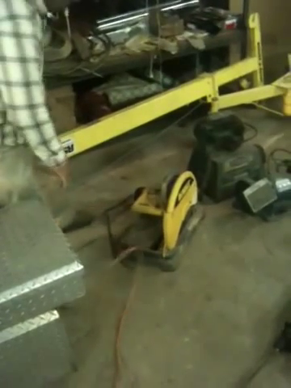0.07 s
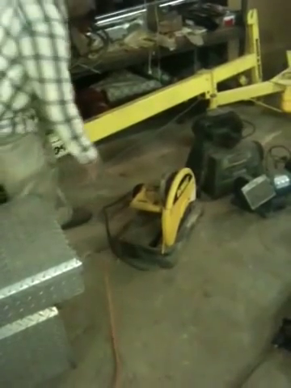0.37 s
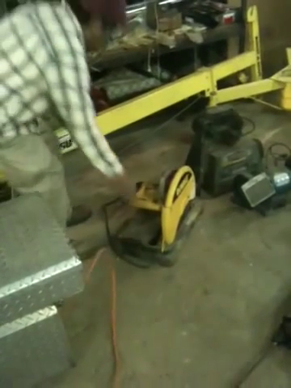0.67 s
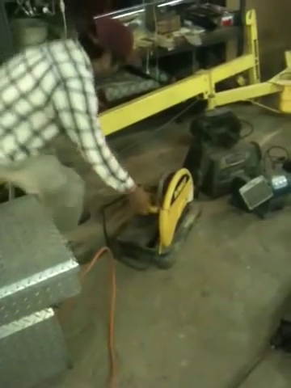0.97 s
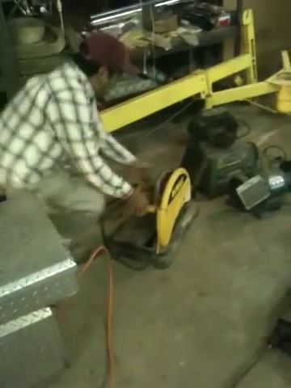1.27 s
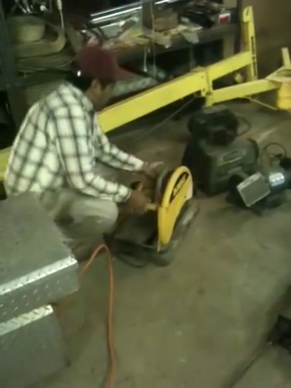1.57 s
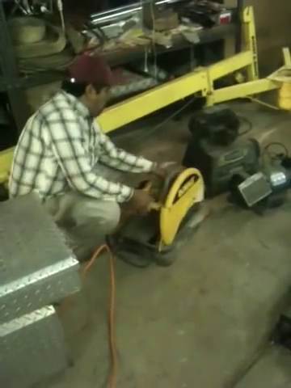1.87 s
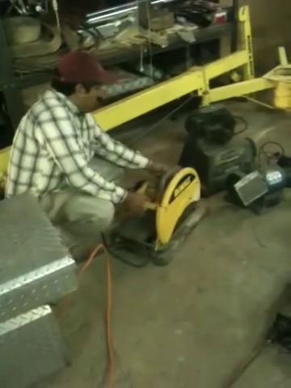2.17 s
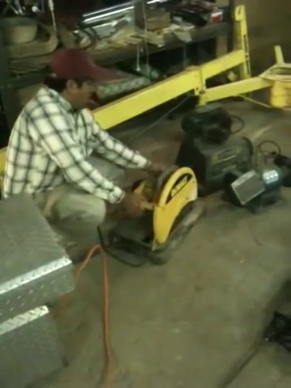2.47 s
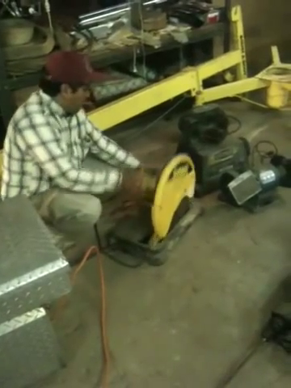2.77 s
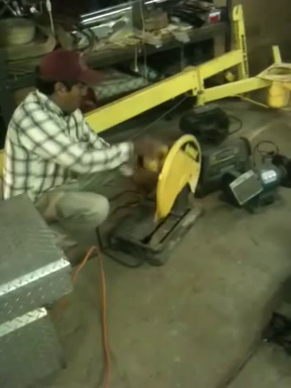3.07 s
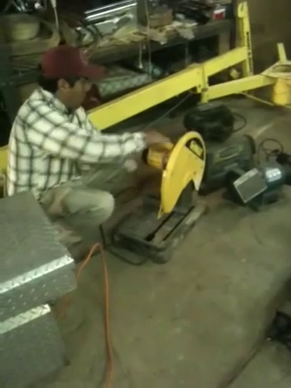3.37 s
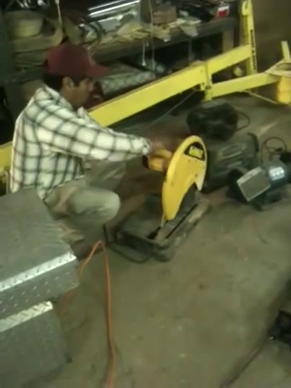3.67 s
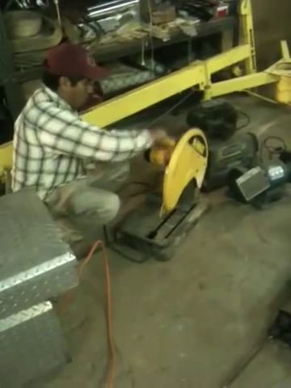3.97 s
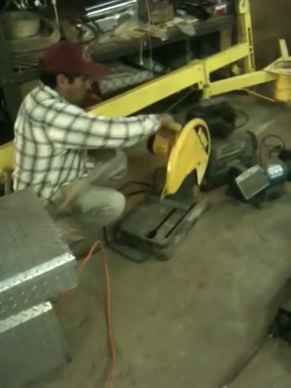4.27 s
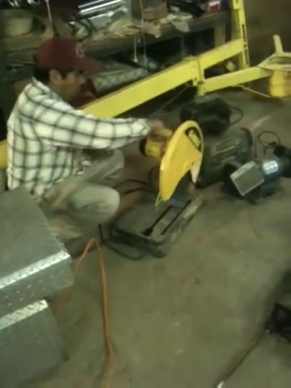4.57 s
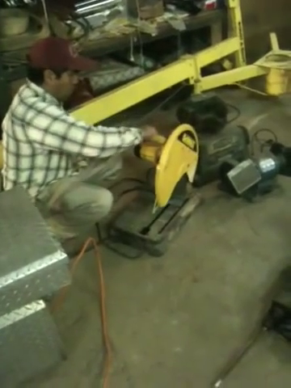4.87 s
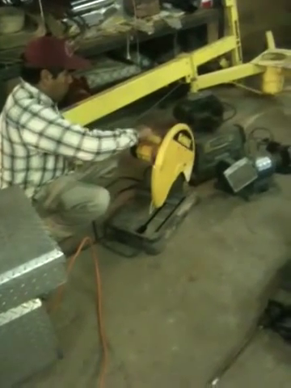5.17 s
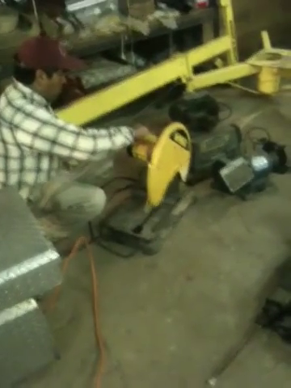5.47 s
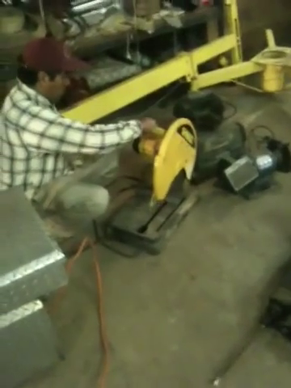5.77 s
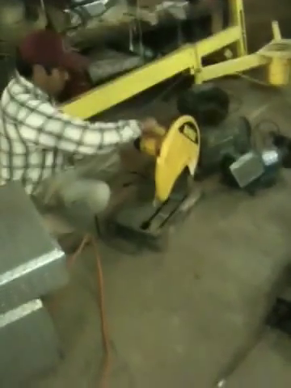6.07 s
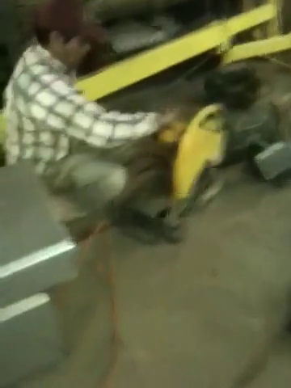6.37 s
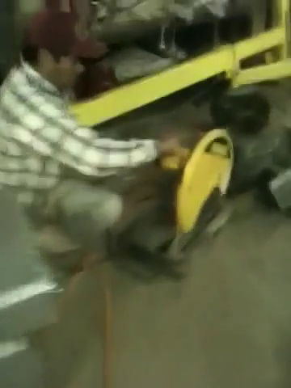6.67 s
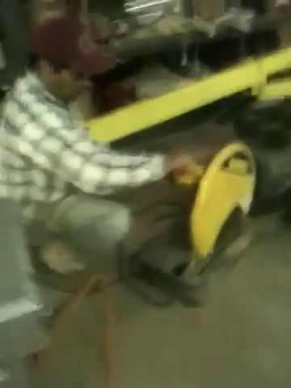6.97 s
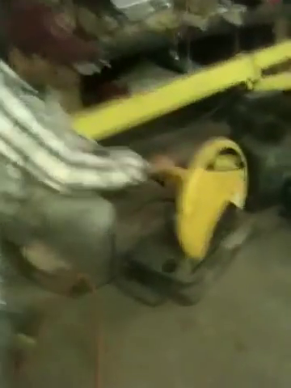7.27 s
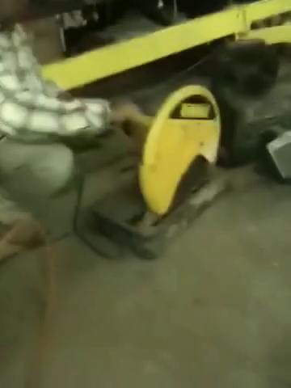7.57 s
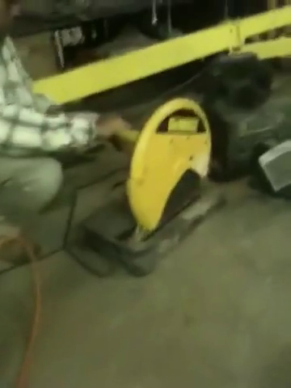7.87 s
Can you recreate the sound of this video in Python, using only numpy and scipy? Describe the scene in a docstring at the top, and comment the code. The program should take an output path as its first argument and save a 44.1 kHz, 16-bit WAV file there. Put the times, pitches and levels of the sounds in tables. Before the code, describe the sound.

A chop saw's head clunks loudly twice, then its motor is blipped and held, running up to a steady whine with rushing air.

```python
"""An abrasive chop saw in a workshop, close to the microphone. Its trigger is blipped, then held: the brush
motor buzzes with inrush current, coasts, and runs up with commutator whine, gear noise and rushing air.
Before that, over the quiet of the room, someone steps up, presses the creaking head down and pulls the
lock pin; the sprung head clunks against its stop. The loudest moments overload the microphone."""
import sys
import numpy as np
from scipy import signal
from scipy.fft import rfft, irfft
from scipy.io import wavfile
from scipy.ndimage import uniform_filter1d

SR = 44100
rng = np.random.default_rng(int(sys.argv[2]) if len(sys.argv) > 2 else 0)


def unload_audio(sound):
    """Save the sound as a 16-bit wav file, at the path given as the first command line argument."""
    columns = np.transpose(np.atleast_2d(sound))
    # keep every value between -1 and 1, then stretch to whole-number steps
    steps = np.round(np.clip(columns, -1, 1) * 32767)
    wavfile.write(sys.argv[1], SR, steps.astype(np.int16))


N = 358533
T = np.arange(N) / SR


def undb(db):
    """Decibels to amplitude."""
    return 10 ** (np.asarray(db) / 20)


def unit(x):
    """Scale to rms 1."""
    return x / np.sqrt(np.mean(x ** 2))


def curve(rows, column=1):
    """One column of a table, joined by straight lines over time."""
    rows = np.array(rows, float)
    return np.interp(T, rows[:, 0], rows[:, column])


def noise():
    """White noise."""
    return rng.standard_normal(N)


def wander(rate_hz):
    """Smooth random drift with rms 1."""
    hold = int(SR / rate_hz)
    stairs = np.repeat(rng.standard_normal(N // hold + 1), hold)
    return unit(uniform_filter1d(uniform_filter1d(stairs, hold), hold)[:N])


def colour(x, spectrum):
    """Minimum-phase filter with the given (Hz, dB) shape and unit power gain."""
    size = 4096
    hz, db = np.transpose(spectrum)
    bins_hz = np.arange(size // 2 + 1) * SR / size
    gain = undb(np.interp(np.log(bins_hz + 1), np.log(hz), db))
    cepstrum = irfft(np.log(gain))
    cepstrum[1:size // 2] *= 2
    cepstrum[size // 2 + 1:] = 0
    response = irfft(np.exp(rfft(cepstrum)))
    return signal.fftconvolve(x, response / np.linalg.norm(response))[:len(x)]


def resonate(x, hz, width):
    """Two-pole resonance, gain 1 at the centre."""
    return signal.lfilter(*signal.iirpeak(hz, hz / width, fs=SR), x)


def soften(x, hz):
    """Roll off the treble above hz."""
    return signal.sosfilt(signal.butter(2, hz, fs=SR, output="sos"), x)


def burst(decay_s):
    """The brief chatter of two surfaces meeting."""
    t = T[:SR // 4]
    return rng.standard_normal(len(t)) * np.exp(-t / decay_s)


def add(track, s, sound):
    """Mix a sound into a track at time s."""
    start = int(s * SR)
    track[start:start + len(sound)] += sound[:N - start]


def room(x, wet_db, low_t60=0.59, treble_t60=0.49):
    """What reaches the microphone: direct sound and the workshop's diffuse tail."""
    t = T[:SR]
    low = soften(rng.standard_normal(SR), 2730)
    white = rng.standard_normal(SR)
    treble = soften(white - soften(white, 1320), 12000)
    tail = low * 1000 ** (-t / low_t60) + 0.47 * treble * 1000 ** (-t / treble_t60)
    tail *= np.clip((t - .002) / 0.0026, 0, 1)  # reflections begin after 2 ms
    reverb = signal.fftconvolve(x, tail / np.linalg.norm(tail))[:N]
    wet = undb(wet_db)
    return (x + wet * reverb) / np.hypot(1, wet)


# room tone all around the microphone: (frequency [Hz], level [dB])
WORKSHOP_SPECTRUM = [(29, -67), (50, -47), (109, -8), (209, -3.5), (236, -2), (267, -7), (552, -12.5),
                     (1390, -15.5), (2310, -22), (3580, -22), (3940, -22.5), (16500, -21.5)]

def room_tone():
    """The quiet workshop: a faint, low noise that wavers slowly."""
    return colour(noise(), WORKSHOP_SPECTRUM) * undb(-62.5 + .9 * wander(3.9))


# soles on the concrete floor by the saw: (time [s], level [dB], brightness [Hz])
STEPS = [(0.133, -48, 800), (0.285, -30, 11000), (0.304, -30.5, 7500), (0.345, -36, 1500),
         (0.38, -35, 1200), (0.42, -38.5, 1200), (0.531, -48, 1200), (0.656, -38, 1000),
         (0.792, -41.5, 260)]
# the thud of a shoe: (frequency [Hz], level [dB])
SHOE_SPECTRUM = [(41, -55), (70, -27), (198, 0), (316, -6.5), (461, 0.5), (515, -5), (687, -16), (838, -15),
                 (916, -16.5), (7360, -29), (14000, -23)]

def footsteps():
    """Heel and sole land, then the weight shifts."""
    contact = np.zeros(N)
    for s, db, bright_hz in STEPS:
        add(contact, s, undb(db) * soften(burst(decay_s=0.0086), bright_hz))
    return colour(contact, SHOE_SPECTRUM)


# a sliding shoe, sleeves and the hinge: (peak time [s], level [dB], rise [s], fall [s])
RUBS = [(0, -33, .01, 0.027), (.165, -53, 0.076, .015), (.3, -51, .006, .035), (.6, -65, .02, .03),
        (.8, -60.5, 0.073, 0.092), (1.46, -60.5, 0.23, 0.18), (1.895, -51.5, 0.12, .035),
        (2.33, -60, .02, 0.018), (2.84, -45, 0.064, .06), (2.905, -42.5, 0.019, 0.042),
        (3.42, -60, 0.12, .025), (3.64, -64, .03, 0.037)]
# their scuffing: (frequency [Hz], level [dB])
SCUFF_SPECTRUM = [(120, -50), (250, -8.5), (400, -1), (600, -12.5), (1300, -11), (2700, -12), (6000, -10),
                  (11000, -9.5), (14000, -17), (16500, -35)]

def rubbing():
    """Grainy sliding friction: each stroke builds up and dies away."""
    strokes = sum(undb(db) * np.exp(-np.maximum((s - T) / rise, (T - s) / fall))
                  for s, db, rise, fall in RUBS)
    return colour(noise() * undb(1.33 * wander(250)), SCUFF_SPECTRUM) * strokes


# the creak at the saw's hinge: (time [s], slip rate [Hz], level [dB])
CREAK = [(2.23, 195, -75), (2.28, 240, -48), (2.33, 254, -40), (2.37, 350, -67), (2.47, 346, -57)]
# hinge resonances: (frequency [Hz], width [Hz], level [dB])
HINGE_MODES = [(231, 45, -6), (314, 83, 2.5), (776, 15, 4), (1020, 220, -5), (1860, 90, -9),
               (2800, 240, -19)]

def hinge_creak():
    """The loaded hinge sticks and slips, faster as the head goes down."""
    slip_count = np.cumsum(curve(CREAK) * (1 + .06 * wander(200))) / SR
    slips = np.diff(np.floor(slip_count), prepend=0) * undb(1.4 * wander(300))
    friction = unit(slips) + 0.53 * noise()
    body = sum(undb(db) * resonate(resonate(friction, hz, 2 * width), hz, 2 * width)
               for hz, width, db in HINGE_MODES)
    moving = (T >= CREAK[0][0] - .03) & (T <= CREAK[-1][0] + .1)
    return unit(body) * undb(curve(CREAK, column=2)) * moving


# handle, lock pin and trigger, close up: (time [s], level [dB], centre [Hz], width [Hz])
CLICKS = [(1.442, -46, 9000, 9000), (1.518, -48, 6000, 2000), (1.529, -48, 6000, 2000),
          (1.64, -61, 6000, 9000), (1.722, -39, 6970, 14400), (2.481, -42, 8400, 6000),
          (2.493, -33.5, 8600, 1400), (2.502, -29.5, 8400, 1400), (2.514, -32, 8400, 1400),
          (2.518, -28, 7500, 8000), (2.532, -40, 3000, 6000), (2.91, -37, 8000, 9000),
          (3.498, -44, 3180, 4170), (3.973, -49, 5000, 8000), (4.022, -29.5, 2930, 4130)]

def clicks():
    """Small hard parts meet, each in a short burst through one resonance."""
    contact = np.zeros(N)
    for s, db, hz, width in CLICKS:
        width_makeup = np.sqrt(SR / 2 / width)
        add(contact, s, undb(db) * width_makeup * resonate(burst(decay_s=.0045), hz, width))
    return soften(contact, 13000)


# blows on the saw's frame, close up: (time [s], level [dB], brightness [Hz])
BLOWS = [(1.925, -22.5, 330), (1.96, -27, 330), (2.12, -38, 500), (2.372, -25, 400), (2.924, 0.5, 1390),
         (2.929, -12, 14000), (2.943, -8, 8970), (4.033, -18, 1540), (4.048, 2.5, 2920), (4.767, -7, 380)]
# the crash of the head on its stop: (frequency [Hz], level [dB])
CRASH_SPECTRUM = [(60, -39), (120, -22), (190, -6), (270, -6), (340, -2.5), (420, -7), (540, -14),
                  (750, -7.5), (1250, -6.5), (1700, -10), (2400, -9), (7800, -3.5), (12700, -12),
                  (16000, -56)]
# ringing of the arm, guard and base: (frequency [Hz], level [dB], t60 [s])
FRAME_MODES = [(317, -11, 0.19), (373, -6.5, 0.08), (402, -6, 0.15), (488, -11, 0.17), (578, -8, 0.2),
               (720, -4, 0.17), (770, -8, 0.12), (909, -9, .24), (1046, -10, .18), (1115, -16, .14),
               (1346, -6, 0.16), (1717, -21, .22), (2912, -13, 0.26), (4269, -16, .3), (4893, -11, .25),
               (5400, -3.5, 0.19)]

def clunks():
    """Each blow gives a dense crash and rings the frame; the deepest bass is cut away."""
    contact, t = np.zeros(N), T[:SR]
    for s, db, bright_hz in BLOWS:
        add(contact, s, undb(db) * soften(burst(decay_s=0.012), bright_hz))
    modes = sum(undb(db) * np.cos(2 * np.pi * hz * t) * 1000 ** (-t / t60) for hz, db, t60 in FRAME_MODES)
    ring = signal.fftconvolve(contact, modes / np.linalg.norm(modes))[:N]
    body = undb(-6.5) * colour(contact, CRASH_SPECTRUM) + undb(-15.5) * ring
    return signal.sosfilt(signal.butter(2, 160, "high", fs=SR, output="sos"), body)


TOP_SHAFT_HZ, GEAR_RATIO, RUNNING_CURRENT_DB = 394.5, 6.1, -33
# trigger pulls, a blip and a hold: (on [s], off [s], inrush level [dB], inrush fade [s])
TRIGGER_PULLS = [(4.028, 4.46, -14.5, 1.8), (4.752, 8.2, -12.5, 0.021)]

def motor(settle_s=0.94, coast_s=4.0, stall_torque=1.68):
    """Speed (share of top speed) and current. Power pulls hardest on a slow rotor; unpowered, it coasts."""
    speed, current = np.zeros(N), np.zeros(N)
    for on, off, inrush_db, fade_s in TRIGGER_PULLS:
        powered, coasting = np.clip(T - on, 0, off - on), np.maximum(T - off, 0)
        shortfall = 1 - speed[int(on * SR)]
        settling = np.exp(-powered / settle_s)
        driven = 1 - shortfall * settling / (1 + stall_torque * shortfall * (1 - settling))
        speed = np.where(T < on, speed, driven * np.exp(-coasting / coast_s))
        draw = undb(inrush_db) * np.exp(-powered / fade_s) + undb(RUNNING_CURRENT_DB)
        switch = (1 - np.exp(-powered / 0.024)) * np.exp(-coasting / 0.0091)
        current += draw * switch
    return speed, current


# magnetic buzz of the stator: (multiple of the mains frequency, level [dB])
STATOR_HARMONICS = [(3, -24.5), (4, -11), (6, -3), (8, -1.5), (10, -8.5), (12, -4), (14, 2), (16, -8),
                    (17, -20), (18, -2), (22, -1.5), (24, -8), (32, -13), (34, -22), (36, -32)]
# sparking at the brushes: (frequency [Hz], level [dB])
SPARK_SPECTRUM = [(100, -45), (170, -24.5), (250, -18.5), (500, -11.5), (900, -11), (1400, -11),
                  (2300, -14), (5000, -12.5), (7000, -11.5), (9500, -13), (14400, -20), (16500, -38)]

def buzz_and_sparks(speed, current, mains_hz=60, groan_hz=303.4):
    """The current shakes the stator at mains harmonics; the brushes spark on every half wave."""
    mains = 2 * np.pi * mains_hz * T
    buzz = sum(undb(db + 0.51 * wander(15))
               * np.sin(k * mains + 0.55 * wander(20) + rng.uniform(0, 2 * np.pi))
               for k, db in STATOR_HARMONICS)
    slow_rotor = np.exp(-((speed - 0.23) / 0.12) ** 2)  # the housing groans most at low speed
    groan = np.sin(2 * np.pi * groan_hz * T) * (.25 + slow_rotor)
    arcing = (.8 + np.sin(mains) ** 2) * undb(2 * wander(500))
    sparks = colour(unit(noise() * arcing), SPARK_SPECTRUM) * current
    pole = np.exp(-1 / (0.03 * SR))  # the housing rings on briefly when the current stops
    shake = np.maximum(current, signal.lfilter([1 - pole], [1, -pole], current))
    hum = (undb(-2.5) * unit(buzz) + undb(3) * groan) * shake
    return room(hum, wet_db=-17.5) + room(sparks, wet_db=-0.5)


# air at the fan and in the wheel guard, close up: (frequency [Hz], level [dB])
HISS_SPECTRUM = [(710, -43), (1200, -26), (1320, -14.5), (1800, -12), (2610, -8.5), (4730, -7.5),
                 (5390, -6), (5890, -3.5), (6430, -3), (10200, -4), (11000, -7.5), (11500, -6.5),
                 (11900, -8.5), (13500, -10), (16500, -29.5)]
ROAR_SPECTRUM = [(76, -60), (130, -22.5), (188, -8), (347, -8), (386, 3), (425, -4.5), (513, -0.5),
                 (578, -4), (635, -1.5), (1220, -3), (2200, -9.5), (2860, -13.5), (4840, -120)]
# brief swells of the rush: (time [s], half length [s], hiss rise [dB], roar rise [dB])
SWELLS = [(4.48, 0.11, 5, 9), (5.558, 0.036, 1, 3), (7.164, 0.096, 1.5, 2.5)]
# a hollow, shifting tone in the roar: (time [s], centre [Hz], relative level [dB])
HOLLOW_TONE = [(6.0, 991, -27.5), (6.13, 819, -19.5), (6.62, 661, -20.5), (6.68, 793, -25.5),
               (7.34, 803, -20), (7.41, 668, -29.5), (7.94, 712, -15), (8.1, 801, -21)]

def rushing_air(speed):
    """The fan hisses, fluttering once per wheel turn, and the wheel roars in its guard."""
    wheel = 2 * np.pi * np.cumsum(speed * TOP_SHAFT_HZ) / SR / GEAR_RATIO
    hiss_db, roar_db = -10, -20
    for s, half_length, hiss_rise, roar_rise in SWELLS:
        swell = np.exp(-((T - s) / half_length) ** 2)
        hiss_db += hiss_rise * swell
        roar_db += roar_rise * swell
    flutter = (1 + 0.1 * np.sin(wheel)) * undb(.5 * wander(30))
    hiss = colour(noise() * flutter, HISS_SPECTRUM) * undb(hiss_db) * speed ** 2.48
    dull = signal.sosfiltfilt(signal.butter(2, 7600, fs=SR, output="sos"), hiss)
    hiss = dull + (hiss - dull) * speed ** 1.14  # the treble grows faster with speed
    roar = colour(noise() * undb(0.46 * wander(23)), ROAR_SPECTRUM) * undb(roar_db) * speed ** 2.74
    hollow_phase = 2 * np.pi * np.cumsum(curve(HOLLOW_TONE)) / SR
    hollow = unit(soften(noise(), 91) * np.sin(hollow_phase))  # a narrow band of noise
    hollow *= undb(curve(HOLLOW_TONE, column=2) - 5) * speed ** 2.2
    return room(hiss + roar + hollow, wet_db=-10)


# hum of the shaft and wheel: (multiple of the shaft speed, level [dB])
UNBALANCE_TONES = [(1, -33), (1.322, -30), (1.625, -40), (2, -36), (2.86, -34.5)]

def unbalance(shaft, speed):
    """Unbalanced parts hum; the guard booms as the rising shaft speed passes through its resonance."""
    hum = sum(undb(db + 1.1 * wander(8.7)) * np.sin(k * shaft + 0.22 * wander(15))
              for k, db in UNBALANCE_TONES)
    shake = speed * np.sin(shaft + .5 * wander(30))
    boom = undb(-27) * resonate(shake, hz=325, width=18)
    return room(np.sqrt(2) * (hum * speed ** 6 + boom), wet_db=-15)


# the gear tone: (time [s], relative level [dB])
MESH_LEVELS = [(6.1, -22), (6.398, -17), (7.338, -19.5), (7.858, -13), (7.864, -16.5), (8.05, -22)]
# guard resonances set off by the gears: (frequency [Hz], width [Hz], level [dB])
GUARD_MODES = [(1930, 420, 2), (3200, 400, 1)]

def gears(shaft, speed, current, teeth=7):
    """A pinion drives the wheel, whose slow turn modulates the mesh; the teeth knock harder under load."""
    wheel = shaft / GEAR_RATIO
    wobble = 1.15 * np.sin(wheel) + .5 * np.sin(2 * wheel) + 1.42 * wander(240)
    octave = np.sin(2 * teeth * shaft + wobble) * undb(1.75 * wander(50))
    fundamental = np.sin(teeth * shaft + wobble) * undb(2.8 * wander(30))
    howl = sum(undb(db) * resonate(resonate(fundamental + octave, hz, width), hz, width)
               for hz, width, db in GUARD_MODES)
    mesh = np.sqrt(2) * (octave + undb(-33) * fundamental + howl)
    load = 0.21 + (current / undb(RUNNING_CURRENT_DB)) ** 0.54  # a little remains when coasting
    return room(mesh * load * undb(curve(MESH_LEVELS) - 3.5) * speed ** 3.1, wet_db=0)


# the whine at the microphone, wavering near top speed: (time [s], relative level [dB])
WHINE_LEVELS = [(6.4, -13), (6.474, -11), (6.982, -10.5), (6.996, -19.5), (7.304, -7), (7.464, -6),
                (7.55, -14.5), (7.896, -14.5), (8.028, -11), (8.1, -25)]

def commutator_whine(shaft, speed, bars=29):
    """The commutator bars pass the brushes: a tone that climbs and grows with speed."""
    tone = np.sqrt(2) * np.sin(bars * shaft + 0.54 * wander(300)) * undb(2 * wander(25))
    return room(tone * undb(curve(WHINE_LEVELS) - 0.5) * speed ** 3.25, wet_db=-2.5)


def scene():
    """Room tone, handling noises and the running saw, in mono from beside the machine."""
    handling = room(footsteps(), wet_db=-5.5, low_t60=0.66)
    handling += room(clunks(), wet_db=-4, low_t60=0.39)
    handling += room(clicks(), wet_db=-3.5)
    handling += room(rubbing() + hinge_creak(), wet_db=-3.5, low_t60=0.24)
    background = room_tone()
    speed, current = motor()
    saw = buzz_and_sparks(speed, current)
    shaft_hz = speed * TOP_SHAFT_HZ * (1 + 0.000364 * wander(60))
    shaft = 2 * np.pi * np.cumsum(shaft_hz) / SR  # angle [rad]
    saw += commutator_whine(shaft, speed) + gears(shaft, speed, current)
    saw += unbalance(shaft, speed) + rushing_air(speed)
    return (background + handling + saw)[None]


def record(dry):
    """The close microphone clips near full scale, and the top is cut at 16.5 kHz."""
    clipped = np.clip(dry, -.97, .97)
    return signal.sosfilt(signal.ellip(8, .2, 70, 16500, fs=SR, output="sos"), clipped)


dry = scene()
out = record(dry)
unload_audio(out)
```